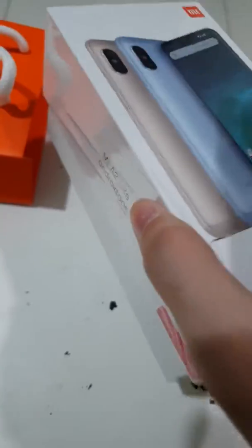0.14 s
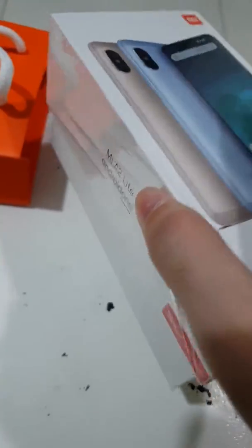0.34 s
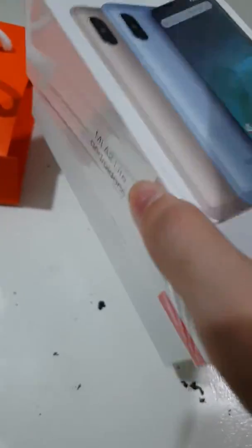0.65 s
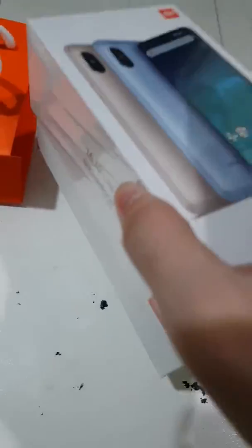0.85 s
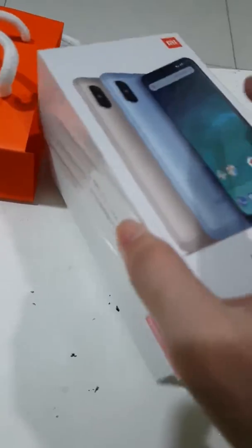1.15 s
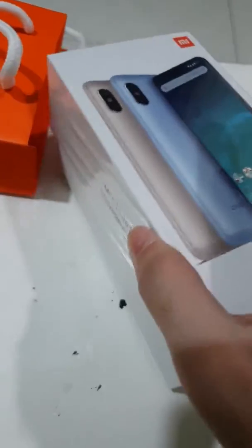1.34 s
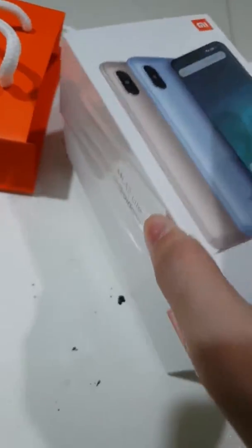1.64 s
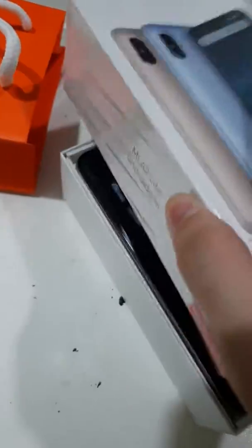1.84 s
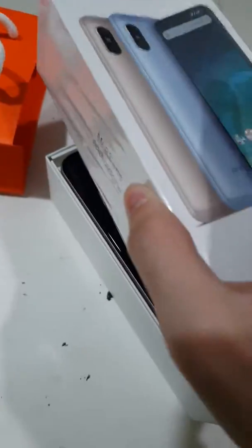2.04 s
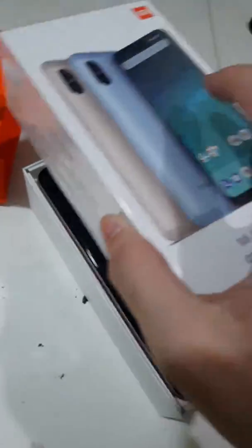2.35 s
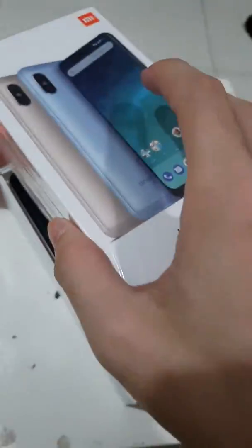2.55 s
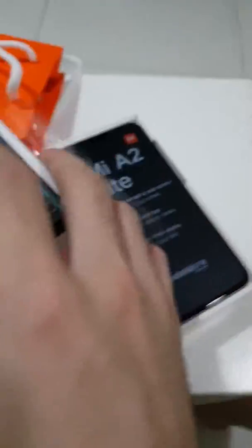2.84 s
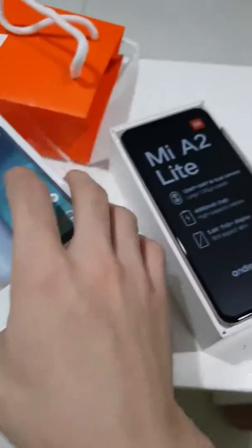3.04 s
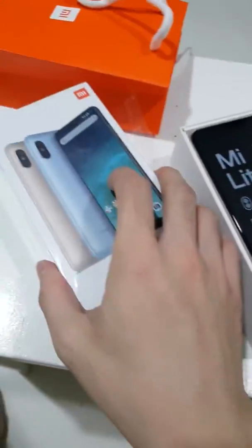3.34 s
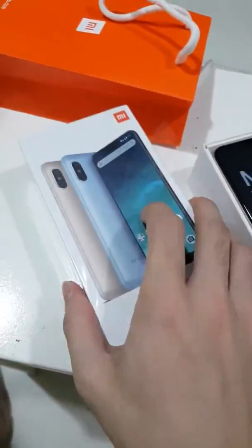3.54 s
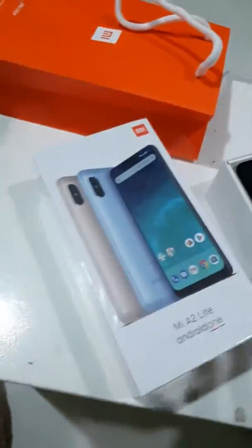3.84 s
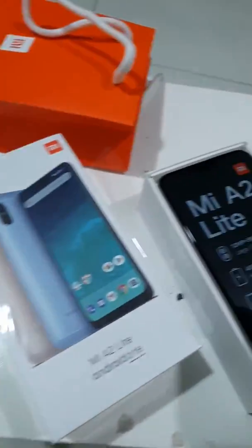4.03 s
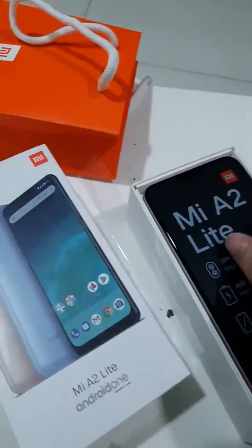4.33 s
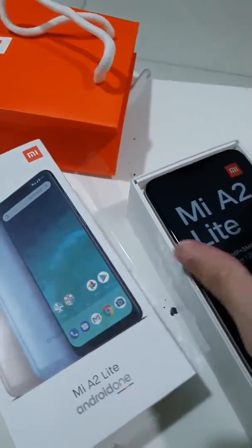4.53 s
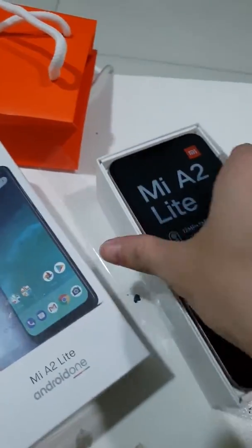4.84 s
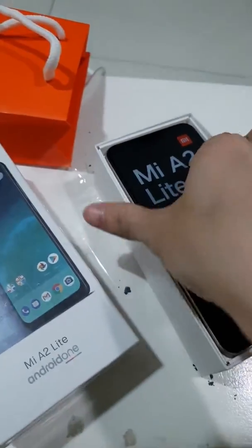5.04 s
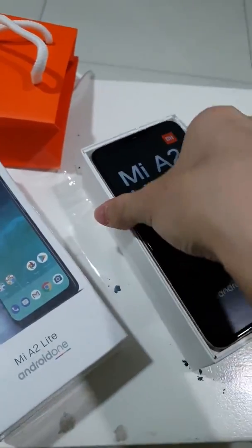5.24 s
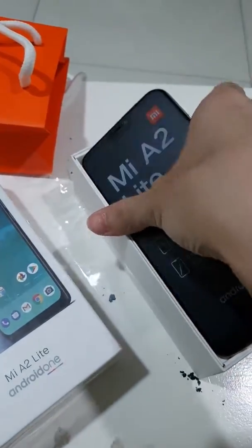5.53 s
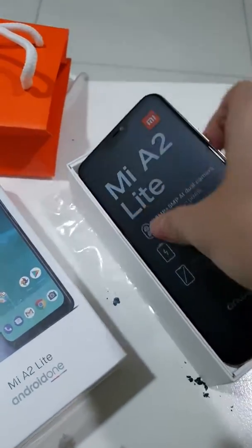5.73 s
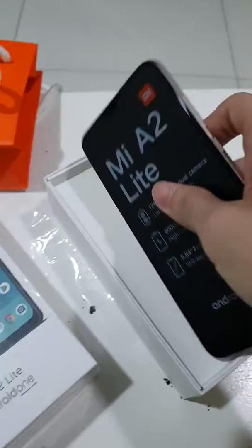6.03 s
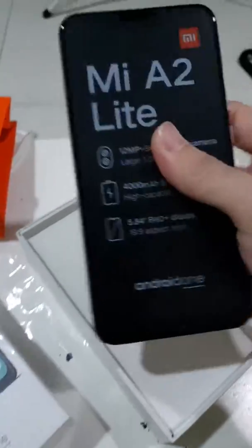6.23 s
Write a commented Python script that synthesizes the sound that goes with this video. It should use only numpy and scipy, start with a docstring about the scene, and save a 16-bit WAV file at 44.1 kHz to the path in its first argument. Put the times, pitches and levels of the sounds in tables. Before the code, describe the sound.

Hollow card thumps build as a tray drops from a tight lid, then a lid knock, faint scrapes, film swishes and tiny fingernail ticks.

```python
"""Opening a cardboard phone box

A stiff box is opened on a table in a small, live room, close to a handheld stereo microphone.
The tray jerks hollowly out of the lid and drops; the lid is put down and pushed aside. Each blow is a pulse,
a burst of noise and ringing tones. Fingers rub card and film (shaped friction noise), then pry out the phone
with small ticks. An echo, a room tail, still air and a faint early rumble lie around it."""
import sys
import numpy as np
from scipy import signal
from scipy.fft import rfft, irfft, next_fast_len
from scipy.io import wavfile

SR = 44100
rng = np.random.default_rng(int(sys.argv[2]) if len(sys.argv) > 2 else 0)


def wav_record(signal):
    """Record a signal, one row per channel, as 16-bit PCM in the file named by sys.argv[1]."""
    frames = np.transpose(np.atleast_2d(signal))
    bounded = np.clip(frames, -1, 1)
    # unit amplitude maps onto the largest positive 16-bit level
    quanta = np.round(bounded * 32767).astype(np.int16)
    wavfile.write(sys.argv[1], SR, quanta)


N = 281358

# Signs that set the two channels apart. Each row: sign of one channel (no unit), left first.
LEFT_RIGHT = np.array([[1], [-1]])


def box_knocks():
    """The tray jerks inside the lid, then lands: hollow card blows, some with crushed fibres."""
    # Blows. Each row: start in seconds, strength in dB before level_db, hardness in dB (clack against
    # thump), extra crack of crushed fibres in dB.
    box_blows = [(0.5406, -45, -23, 25), (0.6302, -44.5, -6.5, 3), (0.668, -35, -5.5, 4),
                 (0.7361, -35.5, -9, 5), (0.767, -42, -11.5, 16.5), (0.7789, -34, -6.5, -1),
                 (1.0526, -27.5, -13.5, -7), (1.1443, -25, 8.5, -9), (1.1969, -36.5, -0.5, -2),
                 (1.3544, -34, -23, -3.5), (1.4502, -29, -21, 3.5), (1.6062, -32, -10.5, -3),
                 (1.6632, -21, -13, -1.5), (1.7856, -30.5, 9, -2.5), (1.809, -35, 2, -1),
                 (1.8148, -22, 5.5, -8.5), (1.8463, -21, -1.5, 8), (1.8589, -32, -2.5, 3),
                 (1.8882, -24.5, 13.5, -3), (1.8981, -23, -7, 4.5), (1.908, -31, -7.5, 4.5)]
    # Colour of a blow on the box. Each row: frequency in Hz, level in dB.
    box_colour = [(35, -42), (60, -8), (346, 4), (651, -6.5), (785, -3.5), (1280, -13), (1470, -14),
                  (1910, -14.5), (2190, -13.5), (2650, -20.5), (3420, -25), (4530, -21.5), (6140, -31.5),
                  (13600, -32.5), (16000, -39)]
    # Ringing tones. Each row: frequency in Hz, level in dB, time to fade by 60 dB in s before ring_scale.
    box_modes = [(205, -14.5, 0.66), (301, -3, 0.5), (360, 4.5, 0.42), (396, -10, 0.18), (422, -8, 0.32),
                 (565.5, -2.5, 0.32), (640, -10.5, 0.15), (780, -9, 0.23), (854, -13.5, .3),
                 (988, -13.5, .22), (1256, -21.5, 0.21), (1402, -8.5, .14), (1810, -22, .22),
                 (2190, -21, 0.21)]
    return knocks(box_blows, box_colour, box_modes, ring_db=-1.5, ring_scale=0.73,
                  flutter_db=0.5, flutter_t60=0.035, crack_t60=0.018, contact=0.00022,
                  level_db=-2.0, crack_db=-12, pans_db=(4, 1, -1))


def lid_knocks():
    """The empty lid lands on the table and rocks."""
    # Blows. Each row: start in seconds, strength in dB before level_db, hardness in dB (clack against thump).
    lid_blows = [(3.1168, -23.5, 10.5), (3.1212, -35.5, 13.5), (3.1612, -23.5, 1.5), (3.168, -22, -6.5),
                 (3.24, -32.5, -12)]
    # Colour of a blow on the lid. Each row: frequency in Hz, level in dB.
    lid_colour = [(60, -14), (150, -15), (290, 7), (500, -2.5), (800, 3.5), (1000, -10), (1270, -5),
                  (1500, -6), (1800, -28.5), (2400, -27), (3200, -39), (8000, -47.5), (13000, -51),
                  (16000, -50)]
    # Ringing tones. Each row: frequency in Hz, level in dB, time to fade by 60 dB in s before ring_scale.
    lid_modes = [(292.8, -2, 0.37), (432, -10.5, 0.44), (510, -11.5, 0.64), (750, -11.5, 0.27),
                 (840, -3.5, 0.19), (1028, -15.5, .4), (1135, -14, 0.041), (1277, -9, 0.134),
                 (1420, -8, 0.13), (1430, -9.5, 0.22)]
    return knocks(lid_blows, lid_colour, lid_modes, ring_db=-7.0, ring_scale=0.96,
                  flutter_db=2.5, flutter_t60=0.035, crack_t60=0.03, contact=0.00072,
                  level_db=-4.0, crack_db=-16.5, pans_db=(3, 3, 2))


def finger_taps():
    """Fingertips pat the card; soft skin makes the contact slow."""
    # Pats. Each row: start in seconds, strength in dB before level_db, hardness in dB (clack against thump).
    tap_blows = [(2.1992, -38.5, 3), (2.3494, -32.5, -5), (2.667, -45.5, -21), (2.692, -46.5, -25),
                 (3.8682, -35.5, -18), (4.1074, -38.5, -6), (4.122, -35.5, -27), (4.9974, -38, -16),
                 (5.0111, -42, -9), (5.0875, -36, -22), (5.63, -50, 6.5), (6.1028, -58.5, -39)]
    # Colour of a pat. Each row: frequency in Hz, level in dB.
    tap_colour = [(60, -41), (150, -20.5), (300, -2.5), (480, -2), (750, -3), (1100, -13.5), (2300, -22),
                  (5000, -28), (16000, -33)]
    # Ringing tones. Each row: frequency in Hz, level in dB, time to fade by 60 dB in s before ring_scale.
    tap_modes = [(347, -12, 0.52), (458, -8, .2), (494.4, 15, 0.099), (804, 2, 0.31)]
    return knocks(tap_blows, tap_colour, tap_modes, ring_db=-4.0, ring_scale=0.54,
                  flutter_db=5.0, flutter_t60=0.041, crack_t60=0.071, contact=0.0011,
                  level_db=-4.5, crack_db=-13, pans_db=(1, 1, 0))


def edge_ticks():
    """Nails, card edges and the phone tick: short blows whose flutter dies fast."""
    # Ticks. Each row: start in seconds, strength in dB before level_db, hardness in dB (clack against thump).
    tick_blows = [(2.3055, -57, 21), (3.6273, -63, 11.5), (4.2887, -53.5, 16.5), (4.3016, -53, 11),
                  (4.4975, -44.5, 9.5), (4.5134, -47, 9.5), (4.537, -38, -2), (5.1952, -41.5, -12),
                  (5.2422, -48, -1), (5.3193, -41, 4), (5.343, -47, -6), (5.5333, -47, 8.5)]
    # Colour of a tick. Each row: frequency in Hz, level in dB.
    tick_colour = [(60, -5), (200, -13), (450, -7.5), (850, 3), (1200, -1), (2100, -8), (3000, 0),
                   (4500, -4), (8000, -21), (16000, -31)]
    # Ringing tones. Each row: frequency in Hz, level in dB, time to fade by 60 dB in s before ring_scale.
    tick_modes = [(360, -10, 0.2), (810, -4, 0.085), (1100, -6, 0.039), (1920, 9, 0.036)]
    return knocks(tick_blows, tick_colour, tick_modes, ring_db=-5, ring_scale=0.42,
                  flutter_db=10.5, flutter_t60=0.012, crack_t60=0.013, contact=0.00027,
                  level_db=-4.5, crack_db=-11.5, pans_db=(5, 3, 1))


def knocks(table, colour, modes, ring_db, ring_scale, flutter_db, flutter_t60, crack_t60, contact,
           level_db, crack_db, pans_db):
    """Each blow flexes a panel in one pulse; the walls flutter briefly and the modes ring on."""
    n, short, attack = SR // 2, 4096, SR // 100  # samples: whole blow, noise burst, first 10 ms
    t = np.arange(n) / SR
    pulse = unit(impulse(colour, n))
    ring = 0
    for hz, db, t60 in modes:
        ring = ring + undb(db - 60 * t / (t60 * ring_scale)) * np.sin(2 * np.pi * hz * t)
    ring = unit(ring)
    yielding = 1 - np.exp(-t / contact)  # card and skin give way before the force builds

    def burst(t60):
        """A fading burst of noise in the colour of the struck thing."""
        fading_noise = diffuse(short) * undb(-60 * t[:short] / t60)
        noise = signal.fftconvolve(fading_noise, pulse[None, :short], axes=1)
        return unit(np.pad(noise, ((0, 0), (0, n - noise.shape[1]))) + 1e-18)

    out = np.zeros((2, N))
    for s, strength, hardness, *crushed in table:
        body = (pulse + undb(ring_db) * ring + undb(flutter_db) * burst(flutter_t60)) * yielding
        thump = band(body, [60, 600], "band")
        clack = -band(body, [600, 2600], "band")
        crack = band(burst(crack_t60) * yielding, 2600, "high", order=4)
        # a hard edge adds clack and crack; crushed fibres add more crack
        shares_db = (0, hardness, hardness + crack_db + sum(crushed))
        sound = 0
        # each part radiates its own way (pans_db: left minus right)
        for part, db, pan in zip((thump, clack, crack), shares_db, pans_db):
            gain = undb(db + pan * LEFT_RIGHT / 2)
            sound = sound + part * gain / np.std(part[:, :attack])  # level set by the first 10 ms
        add(out, s, sound * undb(level_db + strength))
    return out


def rubbing(pull_db=-2, scrape_db=-2, swish_db=-2, pan_db=1):
    """Pulls swell and groan, scrapes start abruptly and rasp, swishes are nearly all hiss."""
    # Pulls on the lid, which drags along the tray harder and harder. Each row: start in seconds,
    # length in seconds, level in dB before pull_db.
    lid_pulls = [(0.417, 0.2, -58.5), (0.694, 0.096, -59), (1.353, 0.14, -57), (1.535, .076, -49),
                 (1.608, 0.25, -49), (1.772, 0.07, -32.5), (1.897, 0.05, -34)]
    # Card pushed over the table or scuffed by a hand. Each row: start in seconds, length in seconds,
    # level in dB before scrape_db, groan of the panel in dB, hiss in dB.
    scrapes = [(0, 0.21, -61.5, 8, -8), (.24, 0.12, -63, 3, -10), (2.063, .19, -53.5, -4, -2.5),
               (2.301, 0.075, -43, -2, -10), (2.816, 0.17, -56, -9, -7.5), (3.122, 0.21, -51, 4.5, -3),
               (3.412, 0.11, -50.5, 8, 0), (3.549, 0.063, -50.5, -6, -6), (3.852, 0.074, -53, 0, -6),
               (4.073, 0.066, -44.5, -11.5, -9.5), (4.2, 0.1, -55, -1, -3), (4.281, 0.045, -31.5, -20, -31),
               (4.378, 0.056, -42.5, -0.5, -4.5), (4.495, 0.079, -43, 1, -5.5),
               (4.722, 0.092, -54.5, 6, -4.5), (4.855, 0.14, -63, 8, 2), (5.056, 0.052, -42, -0.5, -3),
               (5.125, .22, -53, 1, -6.5), (5.385, 0.16, -56.5, 4, -7), (5.523, 0.0073, -44, -8, -1.5),
               (5.581, .13, -72.5, 23, 5), (5.919, 0.12, -62, -14, 5)]
    # Skin slips over glossy film. Each row: start in seconds, length in seconds, level in dB before
    # swish_db, frequency in Hz where the hiss setting applies.
    swishes = [(0.594, 0.058, -55, 11000), (.874, 0.03, -52.5, 11000), (2.433, .023, -51, 11900),
               (2.632, 0.16, -67.5, 9450), (2.873, 0.024, -52.5, 8850), (3.222, 0.04, -56, 7500),
               (3.594, 0.041, -46.5, 15500), (4.427, 0.064, -37.5, 7100), (5.653, 0.059, -53, 10800),
               (5.755, 0.061, -59, 9970), (5.908, 0.08, -49.5, 8360), (6.3, 0.14, -69, 7730)]
    out = np.zeros((2, N))
    drag = np.pad(friction(), ((0, 0), (0, SR)))
    for start, length, db in lid_pulls:
        pull = stroke(drag, start, length, groan_db=4.0, rasp_db=0, hiss_db=-10, hiss_hz=8500,
                      rise=0.42, start_share=0.28, end_share=0.55, release=0.021)
        add(out, start, undb(pull_db + db) * pull)
    for start, length, db, groan, hiss in scrapes:
        scrape = stroke(drag, start, length, groan_db=groan, rasp_db=-1, hiss_db=hiss, hiss_hz=7500,
                        rise=0.35, start_share=0.71, end_share=0.53, release=0.02)
        add(out, start, undb(scrape_db + db) * scrape)
    for start, length, db, hz in swishes:
        swish = stroke(drag, start, length, groan_db=-11.5, rasp_db=-16.5, hiss_db=1, hiss_hz=hz,
                       rise=0.43, start_share=0.23, end_share=0.7, release=0.012)
        add(out, start, undb(swish_db + db) * swish)
    return out * undb(pan_db * LEFT_RIGHT / 2)


def stroke(drag, start, length, groan_db, rasp_db, hiss_db, hiss_hz, rise, start_share, end_share,
           release, hiss_fall_db=7):
    """A stroke presses, slides and lifts; the thing being rubbed colours the friction."""
    # Resonances of rubbed card. Each row: frequency in Hz, level in dB.
    rub_colour = [(50, -20.5), (120, -7.5), (220, -3.5), (360, 2), (560, -1), (880, 4), (1500, 2.5),
                  (2300, 6), (3100, 2), (4700, 1.5), (7500, 3), (13000, 6.5), (16000, 3)]
    i = max(int(start * SR), 0)
    n = next_fast_len(int((length + 0.04) * SR))
    t = np.arange(n) / SR
    peak = length * np.clip(rise, 0.01, 0.99)
    pressure = np.interp(t, [0, peak, length], [start_share, 1, end_share])
    pressure = pressure * np.exp(-np.maximum(t - length, 0) / release)
    octaves = np.sqrt(SR / 4 / np.maximum(bins(n), 50))  # equal power in each octave above 50 Hz
    # groan of the panel, rasp of the card, hiss of skin and film
    tilt = [(400, groan_db), (1600, rasp_db), (hiss_hz, hiss_db), (2 * hiss_hz, hiss_db - hiss_fall_db)]
    colour = octaves * undb(curve(tilt, bins(n)) + curve(rub_colour, bins(n)))
    return irfft(rfft(unit(drag[:, i:i + n])) * colour, n) * pressure


def friction(grain_db=3, grains_per_s=2400, slip_db=1.5, slips_per_s=90, snap_db=7, snaps_per_s=45):
    """Fibres catch and let go in dense tiny clicks; the pressure comes in uneven slips."""
    t = np.arange(N) / SR
    grain = (t * grains_per_s).astype(int)
    slips = undb(slip_db * np.interp(t * slips_per_s, np.arange(N), rng.standard_normal(N)))
    # a fibre can hold only so much before it lets go; now and then a crease snaps
    catches = grain_db * np.minimum(rng.exponential(size=N), 3)
    snaps = rng.random(N) < snaps_per_s / grains_per_s
    catches = np.where(snaps, 3 * grain_db + snap_db, catches)
    return unit(diffuse(N) * undb(catches[grain]) * slips)


def echo(x, lag, db):
    """One reflection off a nearby hard surface, lag seconds later."""
    return undb(db) * np.pad(x, ((0, 0), (int(lag * SR), 0)))[:, :N]


def room(x, gap=0.006, build=0.0027):
    """Hard walls close by: a dense tail that builds up (gap and build in s) just after the direct sound."""
    # Fading of the room. Each row: frequency in Hz, time to fade by 60 dB in seconds.
    room_t60 = [(100, 0.26), (300, 0.33), (800, 0.34), (2000, 0.3657), (5000, .5), (14000, 0.34)]
    # Colour of the tail before it fades. Each row: frequency in Hz, level in dB.
    room_colour = [(60, -10.5), (150, 4.5), (300, -2.5), (700, -1.5), (1500, 0), (3000, -0.5), (7000, 2),
                   (15000, 0)]
    n = SR
    t = np.arange(n) / SR
    spectrum = rfft(shape(diffuse(n), room_colour))
    tail = 0
    for k, (_, t60) in enumerate(room_t60):
        # overlapping bands, each fading at its own speed
        peak_here = [(hz, j == k) for j, (hz, _) in enumerate(room_t60)]
        share = curve(peak_here, bins(n))
        tail = tail + irfft(spectrum * share, n) * undb(-60 * t / t60)
    tail = unit(tail * np.clip((t - gap) / build, 0, 1)) / np.sqrt(n)
    return signal.fftconvolve(x[:1], tail, axes=1)[:, :N]  # the left channel feeds both sides


def still_air(level_db=-62.5):
    """The still air of the room: steady, wide noise, strongest in the bass."""
    # Colour of the air noise. Each row: frequency in Hz, level in dB before it is scaled to level_db.
    air_colour = [(15, -43.5), (25, -13.5), (108, 2), (293, -11), (463, -22.5), (531, -19), (1070, -27),
                  (1560, -26), (1740, -27.5), (4030, -31), (7510, -28), (13600, -29.5), (16000, -33.5)]
    return undb(level_db) * unit(shape(diffuse(N), air_colour))


def handling(level_db=-64, until=0.85, fade=0.7):
    """A faint rumble of the hand on the microphone while the box is lifted; fades after until (s)."""
    fading = np.clip((until - np.arange(N) / SR) / fade + 1, 0, 1)
    return undb(level_db) * fading * unit(band(diffuse(N), [22, 110], "band"))


def diffuse(n):
    """Noise from all sides: alike at both ports in the bass, unrelated in the treble."""
    # Width of diffuse sound at the two ports. Each row: frequency in Hz, side minus mid level in dB.
    width = [(60, -13), (250, -15), (600, -4), (1500, -1), (4000, 0)]
    mid, side = rng.standard_normal((2, n))
    # split the power between mid and side so that the total stays the same
    common = shape(mid, [(hz, -10 * np.log10(1 + undb(2 * db))) for hz, db in width])
    apart = shape(side, [(hz, -10 * np.log10(1 + undb(-2 * db))) for hz, db in width])
    return common + apart * LEFT_RIGHT


def impulse(points, n, size=4096):
    """The most compact causal pulse with this colour (minimum phase)."""
    cepstrum = irfft(np.log(undb(curve(points, bins(size)))))
    # fold the backward half onto the forward half, so nothing sounds before the blow
    cepstrum[1:size // 2] *= 2
    cepstrum[size // 2 + 1:] = 0
    return np.pad(irfft(np.exp(rfft(cepstrum))), (0, n - size))


def shape(x, points):
    """Colour a sound by (Hz, dB) points."""
    n = x.shape[-1]
    size = next_fast_len(n)
    return irfft(rfft(x, size) * undb(curve(points, bins(size))), size)[..., :n]


def curve(points, hz):
    """Read (Hz, value) points on a log-frequency axis."""
    f, value = np.transpose(points)
    return np.interp(np.log(np.maximum(hz, 1)), np.log(f), value)


def bins(n):
    """Frequencies in Hz of an n-point spectrum."""
    return np.arange(n // 2 + 1) * SR / n


def band(x, edges, kind, order=2):
    """Causal Butterworth filter, edges in Hz."""
    return signal.sosfilt(signal.butter(order, edges, kind, fs=SR, output="sos"), x)


def undb(db):
    """Decibels to gain."""
    return 10 ** (np.asarray(db) / 20)


def unit(x):
    """Scale to rms 1."""
    return x / np.sqrt(np.mean(x ** 2) + 1e-30)


def add(out, s, sound):
    """Mix a sound in at time s, in seconds."""
    i = max(int(s * SR), 0)
    out[:, i:i + sound.shape[1]] += sound[:, :max(N - i, 0)]


def scene():
    """Knocks and rubbing, their reflections, the still air and the handling rumble."""
    box = box_knocks()
    lid = lid_knocks()
    taps = finger_taps()
    ticks = edge_ticks()
    rub = rubbing()
    hits = box + lid + taps + ticks
    # each source excites the room by its own amount
    to_room = undb(-7.5) * box + undb(-8.0) * lid + undb(2) * taps + undb(-2.0) * ticks + undb(-5.0) * rub
    walls = room(to_room)
    air = still_air()
    return hits + echo(hits, lag=0.018, db=-15.0) + rub + walls + air + handling()


def record(dry):
    """The very highest peaks are rounded off, and the recorder cuts the top above 16 kHz."""
    rounded = dry / (1 + (dry / 0.92) ** 6) ** (1 / 6)
    top_cut = signal.ellip(10, 0.2, 80, 16000, fs=SR, output="sos")
    return signal.sosfilt(top_cut, rounded)


dry = scene()
out = record(dry)
wav_record(out)
```